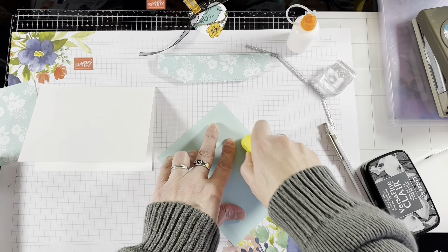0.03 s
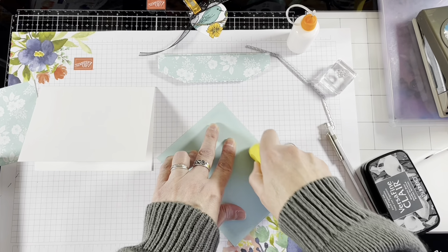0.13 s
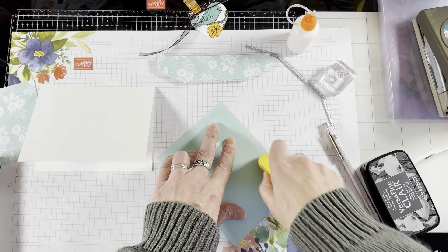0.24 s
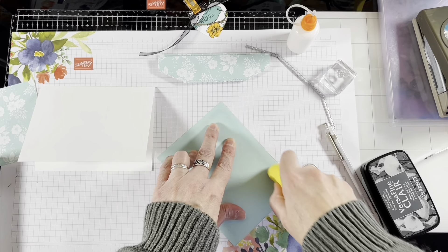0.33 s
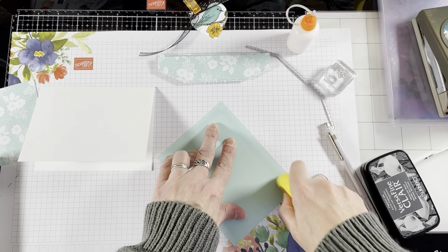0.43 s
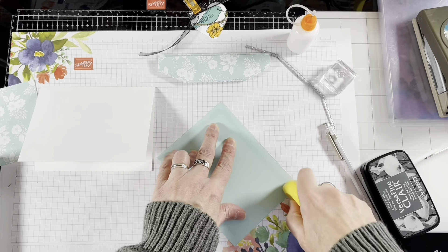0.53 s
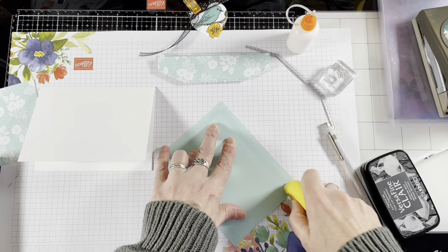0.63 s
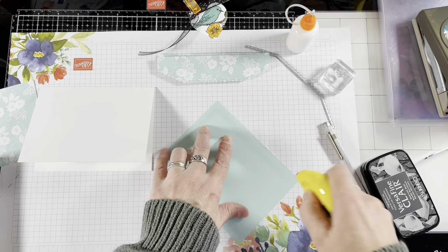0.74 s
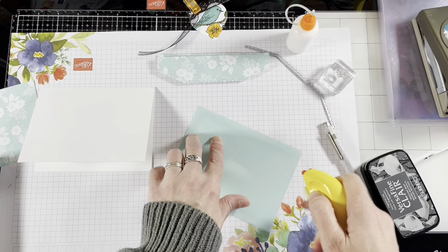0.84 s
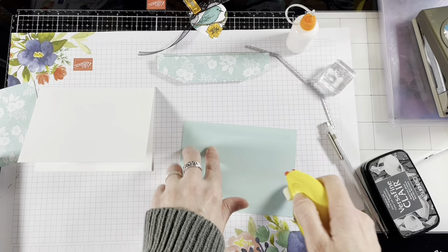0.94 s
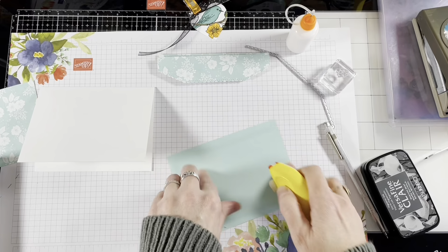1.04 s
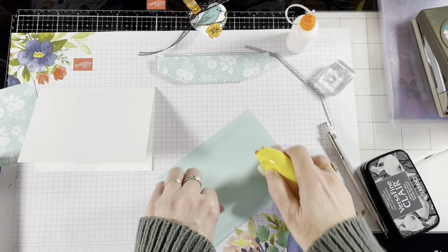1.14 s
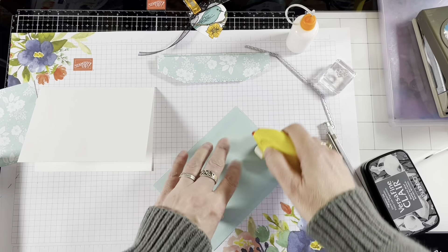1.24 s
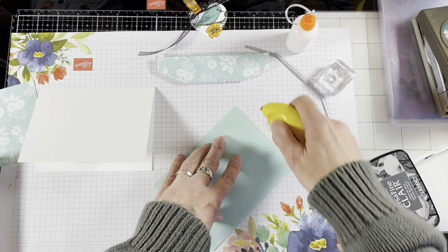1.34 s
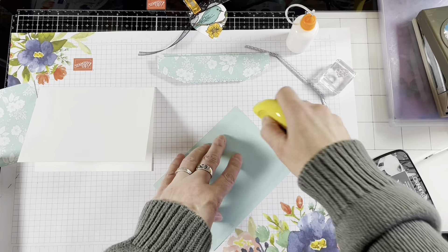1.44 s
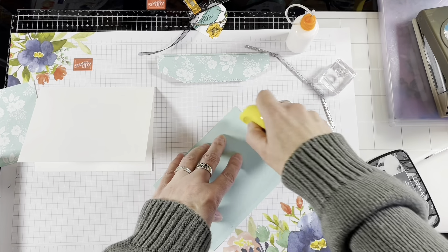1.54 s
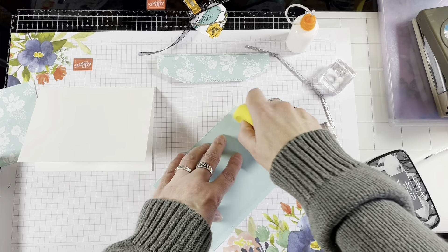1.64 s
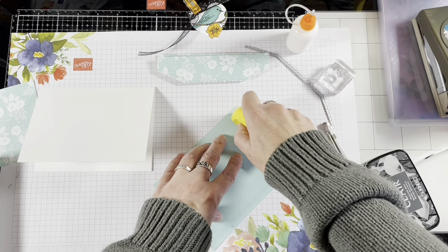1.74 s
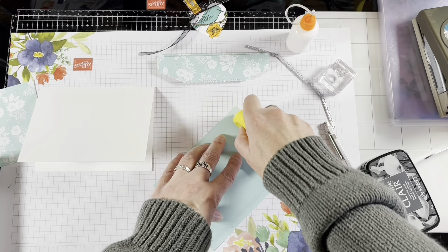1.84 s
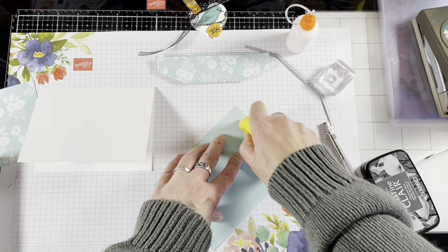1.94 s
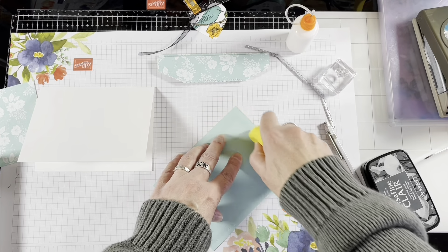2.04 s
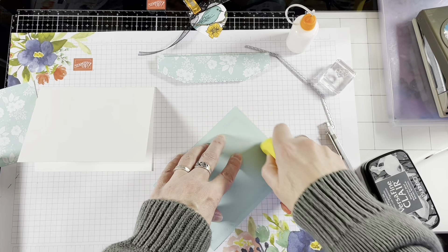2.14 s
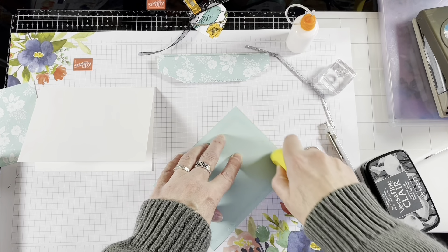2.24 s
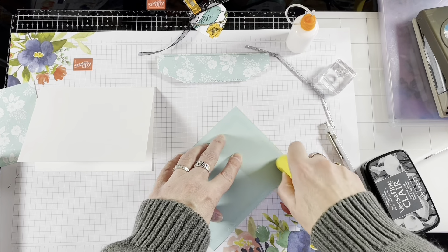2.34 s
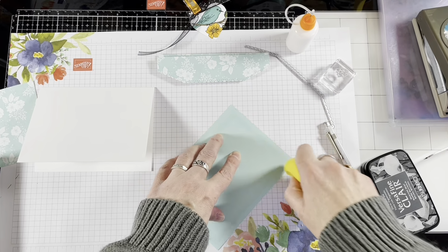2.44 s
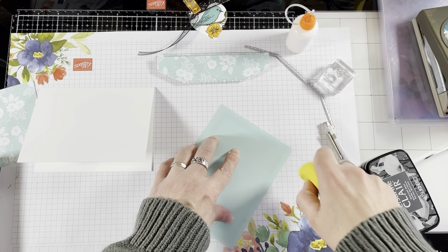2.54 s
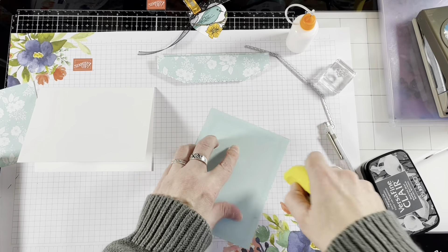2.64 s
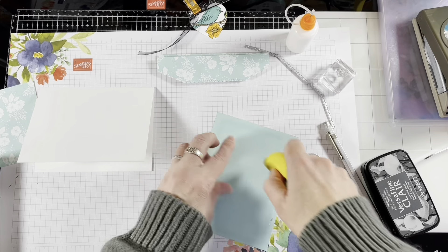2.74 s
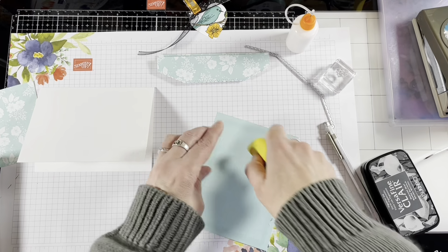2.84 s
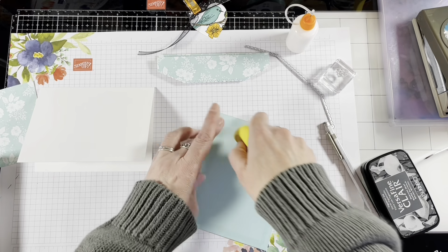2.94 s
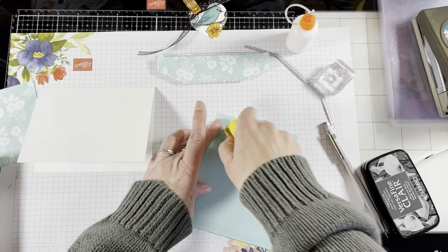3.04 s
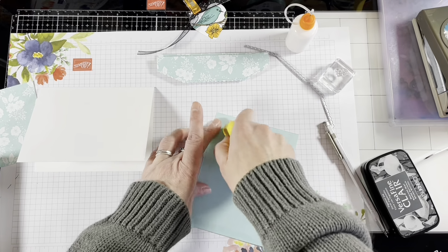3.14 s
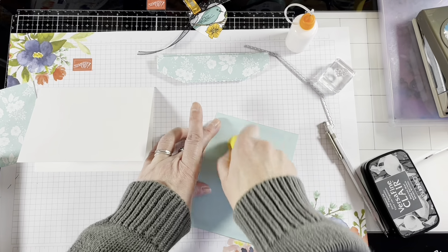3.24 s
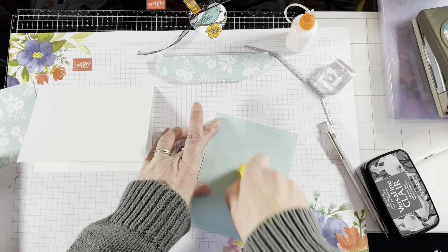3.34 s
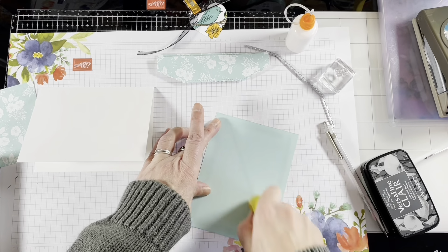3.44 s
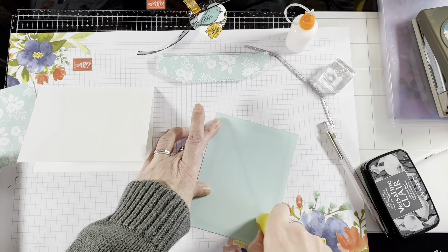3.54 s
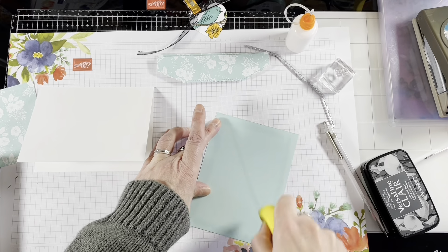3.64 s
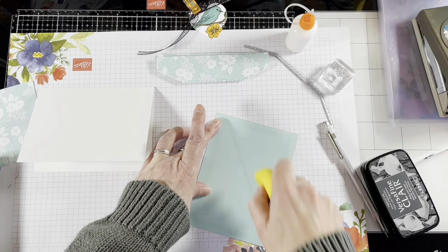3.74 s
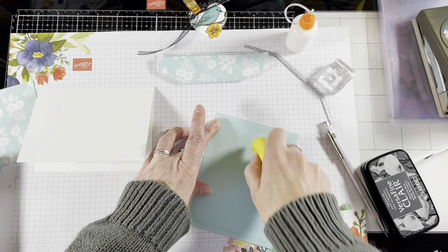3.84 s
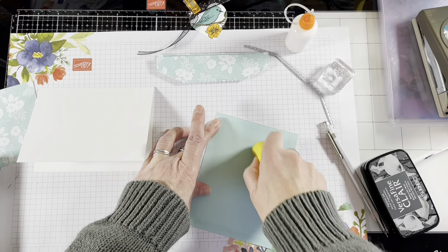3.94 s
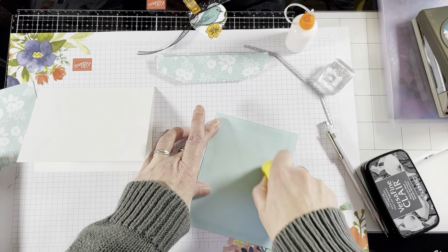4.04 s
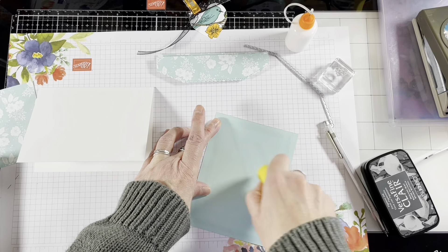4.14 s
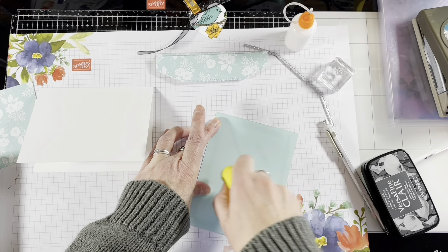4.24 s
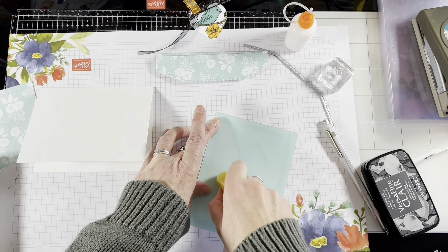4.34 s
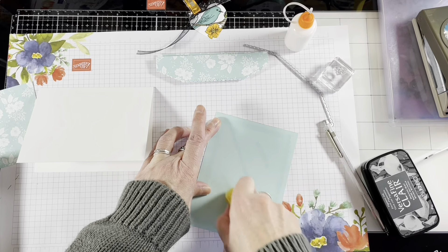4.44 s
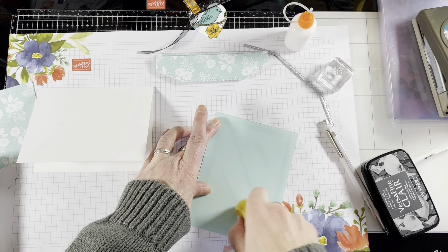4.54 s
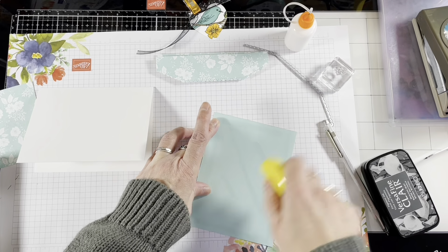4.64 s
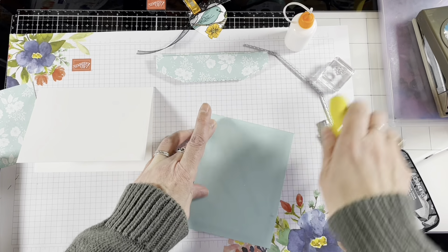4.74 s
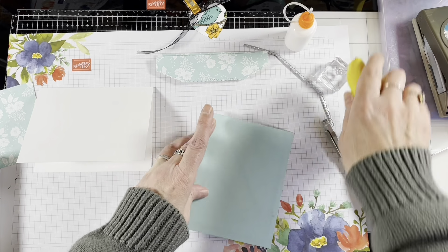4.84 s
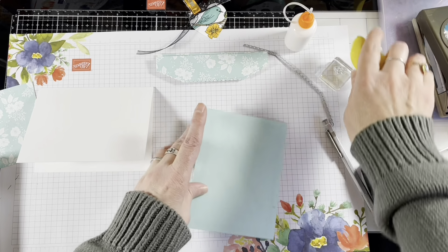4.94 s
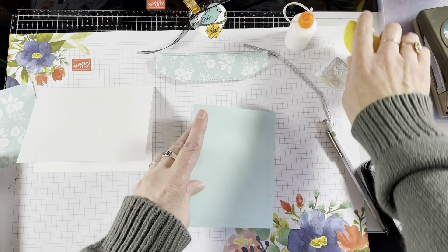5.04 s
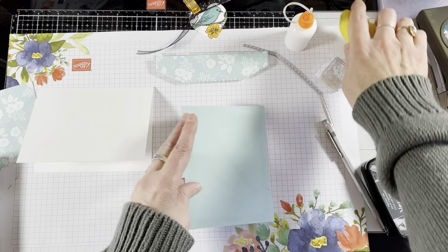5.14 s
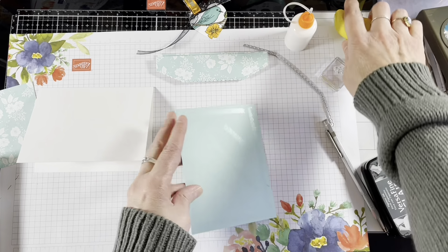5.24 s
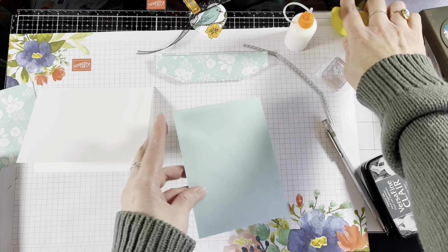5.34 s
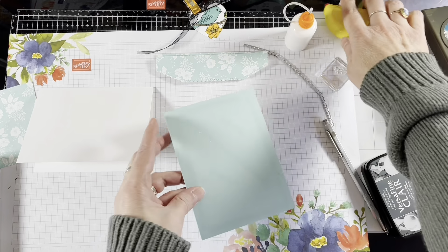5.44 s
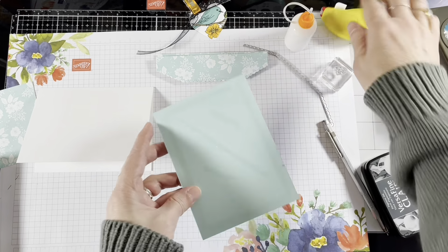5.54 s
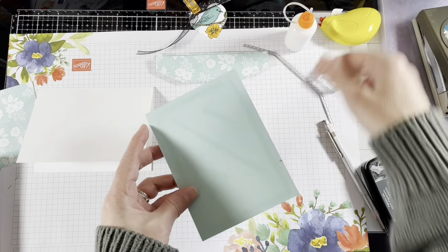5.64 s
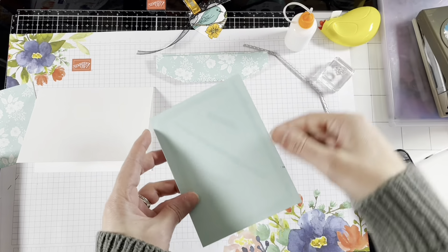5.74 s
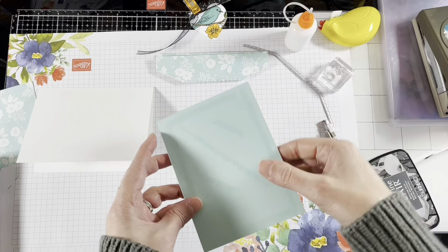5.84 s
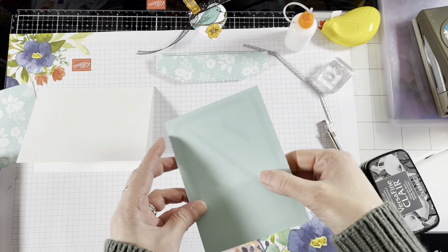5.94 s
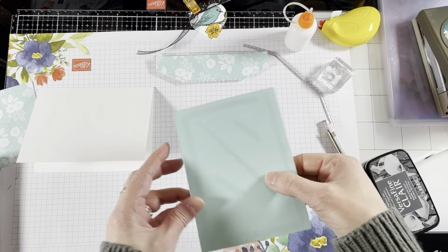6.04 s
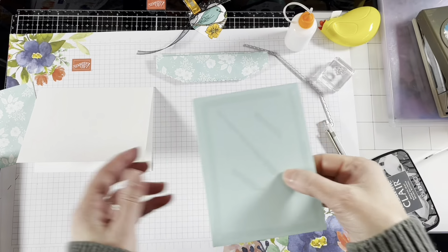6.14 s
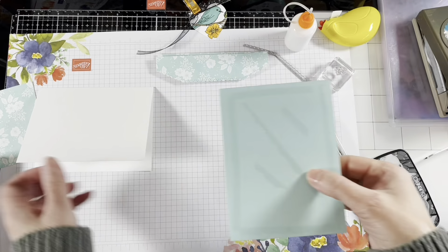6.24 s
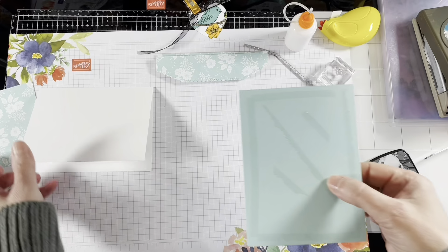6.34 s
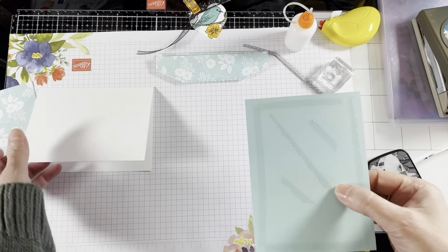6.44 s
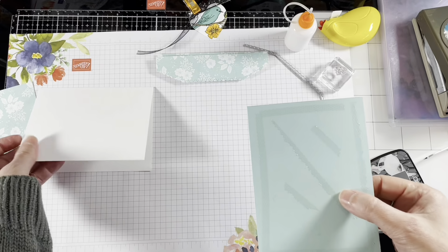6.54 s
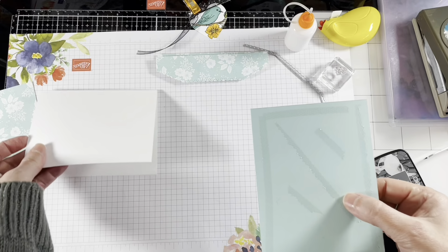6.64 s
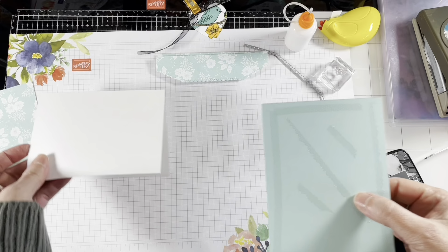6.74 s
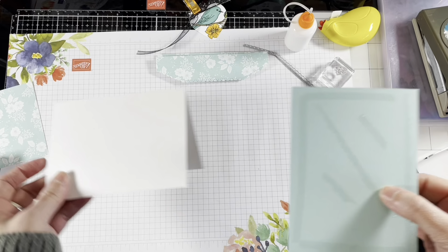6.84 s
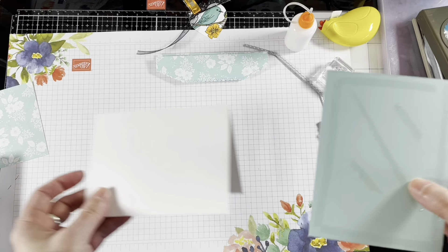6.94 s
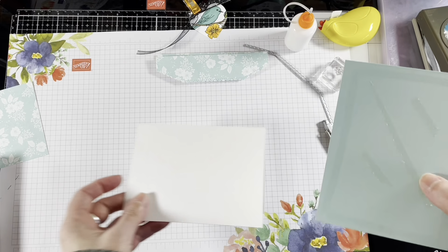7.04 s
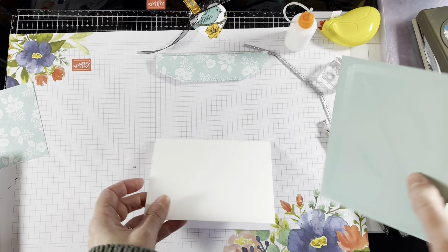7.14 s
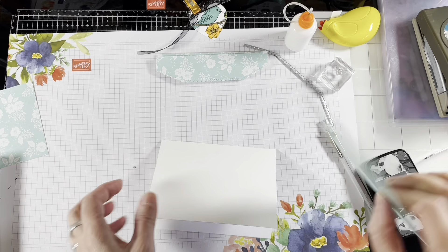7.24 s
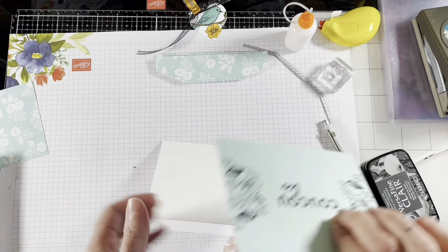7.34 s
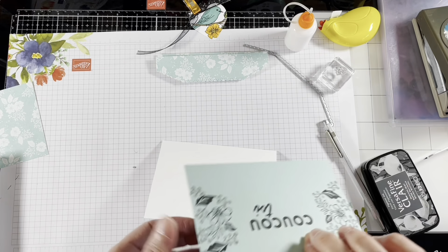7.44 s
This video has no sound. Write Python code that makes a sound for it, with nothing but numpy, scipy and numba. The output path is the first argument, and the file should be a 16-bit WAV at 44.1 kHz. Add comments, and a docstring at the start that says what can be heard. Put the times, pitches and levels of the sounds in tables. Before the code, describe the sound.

A handheld glue tape runner hisses and chatters across card in five strokes, then clatters down hard on the table; card rustles faintly afterwards.

```python
"""Craft table in a quiet room: a glue tape runner is drawn five times across a card. Moving resonances on dense
noise grains make the hissing roller, chattering housing and squeaking spool. Filtered grains make the card
slide and flap between strokes, and the room linger after some knocks; struck modes and short noise bursts make
knocks and ticks as the runner is dropped and rocks to rest. Narrow noise bands make an appliance's drone; two
ports of a phone hear it all with an echo."""
import sys
import numpy as np
from scipy import signal
from scipy.fft import rfft, irfft, next_fast_len
from scipy.io import wavfile
from scipy.ndimage import uniform_filter1d
from numba import njit

SR = 44100
rng = np.random.default_rng(int(sys.argv[2]) if len(sys.argv) > 2 else 0)


def unload_audio(sound):
    """Save the sound as a 16-bit wav file, at the path given as the first command line argument."""
    columns = np.transpose(np.atleast_2d(sound))
    # keep every value between -1 and 1, then stretch to whole-number steps
    steps = np.round(np.clip(columns, -1, 1) * 32767)
    wavfile.write(sys.argv[1], SR, steps.astype(np.int16))


N = 330729

# Tape strokes. Each row: touch in seconds, swell in seconds, travel in seconds, drift over the travel in dB,
# hiss in dB, hollow of the housing in dB, ring of the nose in dB, squeak drift in dB, squeak level in dB,
# mean ratchet teeth per second, half the fall over one tooth in dB.
STROKES = [(0.0, 0.0013, 0.545, -2, -42, -53, -56.5, -14, -58, 63.95, 7),
           (1.838, 0.17, 0.26, -3, -37, -52.5, -48, 0, -53, 69.9, 6.4),
           (3.185, 0.11, 0.21, -3.8, -32.5, -47.5, -45, 6, -55, 85.4, 4),
           (3.91, 0.071, 0.083, 2, -37, -50.5, -57.5, 3, -54.5, 90.1, 2.8),
           (4.328, 0.07, 0.11, 0.5, -37, -54.5, -53, 0, -59, 79.5, 9.2)]
# Card, fingers, sleeve or housing sliding, and the room lingering on after some knocks. Each row: touch in
# seconds, swell in seconds, travel in seconds, # drift over the travel in dB, rustle in dB, body of the card in
# dB, low tone in dB.
SLIDES = [(0.672, 0.0088, 0.1, -16, -63.5, -57.5, -60), (0.7, .11, 0.368, -1, -50, -66.5, -89),
          (0.83, 0.028, 0.023, 0, -71, -54, -48), (1.04, .015, 0.012, -7, -61, -60.5, -59),
          (1.12, 0.019, 0.057, -3.5, -95, -68.5, -65), (1.19, 0.024, 0.0053, -8, -44.5, -55.5, -56),
          (1.275, .01, 0.11, -23, -59.5, -63, -61), (1.34, 0.035, 0.049, -8.5, -79, -85.5, -58.5),
          (1.69, 0.014, 0.041, -14.5, -64.5, -59.5, -64.5), (1.79, 0.03, 0.037, -2, -79, -68, -70),
          (2.27, 0.02, 0.097, -7, -49.5, -59.5, -64), (2.4, 0.0085, 0.28, -7.5, -56.5, -64.5, -63),
          (2.5, 0.031, 0.19, -6, -56.5, -65.5, -84), (2.645, 0.0045, 0.078, -5, -51, -69.5, -103),
          (2.61, 0.015, 0.031, -7, -86, -71, -53.5), (2.984, 0.004, 0.032, -14, -57.5, -57.5, -52),
          (3.024, 0.013, 0.056, -11, -63, -57.5, -46), (3.15, 0.034, 0.0215, 0, -63, -66, -69),
          (3.52, 0.018, 0.029, -4.5, -52, -51.5, -62.5), (3.59, 0.014, 0.0086, 5.5, -58.5, -74, -83),
          (4.1, .02, 0.12, -12, -73, -67, -79), (4.16, 0.024, 0.016, -8, -70, -67.5, -62.5),
          (4.53, 0.044, 0.13, 4.5, -65, -76, -86), (4.715, 0.014, 0.12, -20, -56.5, -77, -99),
          (4.85, 0.037, 0.54, -10, -64.5, -80, -104), (5.05, .09, 0.052, -2, -68.5, -71.5, -99),
          (5.23, 0.023, 0.043, -2.5, -76.5, -74, -68), (5.358, .015, 0.014, -7.5, -67.5, -64, -44.5),
          (5.39, .02, 0.091, 3, -75, -70.5, -67.5), (5.6, .02, 0.1, -22, -52, -47, -35.5),
          (5.72, 0.0095, 0.12, -14.5, -66, -75, -57.5), (5.85, 0.041, 0.0091, -9, -69, -67.5, -63.5),
          (5.96, 0.0094, 0.018, -24.5, -79.5, -74, -53), (6.04, .022, 0.16, -19, -71, -64.5, -59),
          (6.525, 0.0097, 0.15, 6, -67.5, -70, -84), (6.715, .02, 0.024, -2.5, -54, -65, -96),
          (6.772, 0.0063, 0.019, -5.5, -54, -63.5, -73), (7.045, .008, 0.032, 1, -57, -68, -76),
          (7.065, 0.025, 0.0094, -17, -43.5, -48, -58), (7.115, 0.021, 0.04, -11, -53.5, -59.5, -62.5),
          (7.18, 0.022, 0.14, -10.5, -72.5, -75, -78.5)]
# Housing, later the card, knocking on the table. Each row: start in seconds, shell peak in dB,
# then re that peak: crack in dB, table thud in dB, cavity in dB.
KNOCKS = [(0.85, -50, 18.5, -20, -4), (1.698, -52, 6, 7, -3), (2.395, -44.5, 10.5, -6.5, -11.5),
          (2.551, -51, -8, -16, 8.5), (2.570, -41, -2, -12, 12), (2.597, -52, -13, -25.5, 14.5),
          (3.034, -45.5, -11.5, -4, 3.5), (3.055, -51.5, -10, -1.5, 9), (3.894, -37, 4.5, -5, 4),
          (4.313, -32.5, 1, -9, 6), (5.238, -49, -47.5, -4, 1), (5.278, -57, -25, -18, -7.5),
          (5.318, -47, 8.5, -4, -2), (5.362, -39, -3.5, -9, -4), (5.467, -29, -12, -36.5, -13),
          (5.483, -6, -7, -31, -11.5), (5.492, -10, -11, -23.5, -10.5), (5.528, -13, -3.5, -28.5, -16),
          (5.561, -22, -2.5, -29.5, -8), (5.571, -14.5, -3.5, -23.5, -13.5), (5.583, -17, -10.5, -23, -10),
          (5.598, -19, -13, -30.5, -14), (5.616, -24, -0.5, -17, -10.5), (5.629, -29, -7, -27, -7),
          (5.641, -36, -22, -25, -5), (5.668, -42.5, -19, -25, -8), (5.723, -35, -17, -10, -12),
          (5.734, -42, -21, -20, -15), (5.917, -52.5, -2, -11, 1), (5.955, -50, 6.5, 1.5, 6),
          (6.047, -47.5, 8, -21, 1), (6.059, -35, 4.5, -13, -2.5)]
# Ticks of ratchet, tape and card edge. Each row: start in seconds, peak in dB, pitch in Hz.
TICKS = [(0.002, -34, 3330), (0.036, -45, 4440), (0.0518, -41, 4410), (0.068, -34, 4350),
         (0.084, -38.5, 4380), (0.101, -32.5, 4400), (0.1176, -36, 4370), (0.136, -32, 4250),
         (0.1511, -39, 4160), (0.196, -39, 4430), (0.2384, -46, 5290), (0.258, -35.5, 4060),
         (0.2948, -40, 4120), (0.4058, -34, 4460), (0.422, -33, 4460), (0.4691, -32, 4230),
         (0.4858, -37.5, 4320), (0.506, -39, 4290), (0.0567, -38.5, 3500), (0.0853, -31, 3280),
         (0.1132, -28.5, 3580), (0.133, -31, 3270), (0.1558, -25, 3330), (0.177, -25, 3410),
         (0.32, -36, 4350), (0.331, -34, 4340), (0.3464, -30, 5540), (0.3591, -24.5, 4980),
         (0.3747, -29.5, 5660), (0.387, -31, 4850), (0.452, -31.5, 4180), (0.5287, -38.5, 4400),
         (0.5688, -31.5, 4730), (0.674, -17.5, 3750), (0.677, -30, 3793), (1.213, -68, 4420),
         (1.283, -45, 6000), (1.856, -29.5, 4650), (1.8899, -30, 4380), (1.913, -32.5, 4460),
         (1.938, -34, 4400), (1.955, -29, 4370), (1.9704, -33, 4490), (1.991, -36, 4400),
         (2.0379, -43, 4460), (2.056, -36, 4550), (2.1326, -38, 4500), (2.1467, -42, 4480),
         (2.185, -32.5, 4340), (2.242, -36, 4260), (2.2537, -37.5, 4230), (2.136, -33, 3250),
         (2.262, -35, 3380), (2.289, -33, 4300), (2.3143, -42, 4500), (2.3494, -36, 4560),
         (2.399, -38, 4330), (2.57, -43, 3720), (2.658, -42, 4870), (2.986, -56, 2894), (3.198, -57, 3300),
         (3.262, -47, 3230), (3.29, -39, 4240), (3.334, -31, 4300), (3.349, -28, 4260), (3.361, -30, 4330),
         (3.377, -42, 4270), (3.392, -34, 3290), (3.418, -29, 3274), (3.424, -28, 6140), (3.482, -25, 3330),
         (3.5081, -31, 3440), (3.529, -39, 3330), (3.567, -39, 3273), (3.9818, -34, 3560),
         (4.157, -48.5, 4900), (4.381, -42, 3100), (4.398, -22, 6150), (4.453, -25.5, 3470),
         (4.5076, -37, 3520), (4.7286, -47.5, 3510), (5.491, -14.5, 4700), (5.5699, -6.5, 5055),
         (6.742, -52, 3010), (6.777, -48.5, 2970), (7.086, -46, 5800), (7.135, -56, 2950)]
# Faint breathy tones. Each row: start in seconds, length in seconds, mean level in dB, pitch in Hz.
TONES = [(1.228, 0.1, -76.5, 1000), (4.202, 0.14, -73.5, 950), (4.871, 0.32, -76.5, 2030),
         (5.808, 0.014, -66.5, 2480), (6.174, 0.063, -75.5, 978), (7.194, 0.063, -71.5, 990)]
# Housing shell, struck. Each row: mean pitch in Hz, mean level in dB, nominal t60 in seconds.
HOUSING_MODES = [(904, -8, 0.048), (1007.5, 1, 0.023), (1127, -3.5, 0.03), (1257, -6.5, 0.042),
                 (1430, 2.5, 0.022), (1840, -16.5, 0.013), (1787, -5.5, 0.043), (1780, -13.5, 0.11),
                 (1980, -7, 0.037), (2137, -5, 0.035), (2460, -8.5, 0.041), (3300, -11.5, 0.03),
                 (3830, -15.5, 0.014)]
# Air and walls of the hollow housing, struck. Each row: mean pitch in Hz, mean level in dB, nominal t60 in seconds.
CAVITY_MODES = [(373, -16, 0.04), (624, 0, 0.095)]
# Table, struck. Each row: mean pitch in Hz, mean level in dB, nominal t60 in seconds.
TABLE_MODES = [(60, -5, 0.41), (109.6, 7.5, 0.26), (157, -10.5, 0.53), (256.8, -9, 0.064)]
# Housing, rubbed. Each row: mean pitch in Hz, width in Hz, mean level in dB.
RUBBED_MODES = [(1058, 97, 9), (1245, 50, 15), (1746, 89, -1.5), (2140, 78, -2), (2694, 96, 1),
                (5100, 300, -6)]
# Resonances that ring in the slides: mean pitches in Hz.
SLIDE_RING_HZ = (970, 1730, 2280, 3070)
# Colour of peeling tape. Each row: frequency in Hz, level per Hz in dB.
TAPE_COLOUR = [(200, -13), (700, -6.5), (1500, -9.5), (3000, -2), (5000, -2.5), (7000, -1.5), (9500, -1.5),
               (13000, -12.5), (15500, 0.5)]
# Colour of rubbed card. Each row: frequency in Hz, level per Hz in dB.
CARD_COLOUR = [(1500, -40.5), (2800, -3.5), (4000, 0.5), (6000, 3.5), (8000, 5), (10000, 1.5),
               (13000, -7.5), (15500, -1)]
# Colour of the room air. Each row: frequency in Hz, level per Hz in dB.
AIR_COLOUR = [(12, -39), (20, -8.5), (50, -10.5), (76, -18.5), (114, -2), (137, -21.5), (200, -26.5),
              (307, -24), (370, -24), (470, -43.5), (1020, -41.5), (1340, -46.5), (12000, -63.5),
              (15600, -95.5), (22000, -120)]
# Extra colour of the air part that differs left and right. Each row: frequency in Hz, gain in dB.
AIR_WIDE = [(60, -36.5), (200, -15), (500, 1), (2000, -4.5), (6000, -2), (12000, -6)]
# Appliance drone. Each row: pitch in Hz, width in Hz, level in dB.
DRONE = [(56.14, 14, -61.5), (111.8, 4.9, -63)]
# Room decay. Each row: band centre in Hz, t60 in seconds.
ECHO = [(150, 0.47), (600, 0.11), (2000, 0.22), (8000, 0.26)]
# Two ports of the phone. Each row: frequency in Hz, phase between the ports in radians.
PORTS = [(0, 0), (150, 0), (600, -.6), (860, .1), (2400, .1), (2850, .7), (4500, .1), (5400, .6),
         (6100, 1.4), (8300, 2.5), (9500, 2.75), (9900, 3.03), (13300, 3.03), (13600, 3.7), (15000, 3.9),
         (15700, 4.5)]

HOLLOW_HZ, SQUEAK_HZ = 619, 3324
SPOOL_THROB_DB, SHELL_FLICKER_DB, RESONANCE_FLICKER_DB = 1.9, 1.5, 2
SLIDE_RING_WANDER = 0.037  # share of the pitch
LIFT_DB_PER_S, SETTLE_DB_PER_S = 380, 523  # fade after the runner lifts; after a slide stops
ONSET_POWER = 0.99  # gain grows as this power of the time since touching
PUT_DOWN_S = 5.63  # the runner settles; later taps do not ring its cavity
HARD_KNOCK_RISE_S, SOFT_KNOCK_RISE_S = 0.0025, 0.0055
SOFT_KNOCK_DB = -38  # softer knocks are cushioned by the hand
GRIP_S = 0.006  # e-fold time of the stronger first swings
SPOOL_RING_S, TICK_RING_S = 0.043, 0.016  # scale of push decay and inverse bandwidth
SPOOL_SNAP_DB, TICK_SNAP_DB = -5.5, -5.5  # snap re burst
SPOOL_PUSH_SHARE, TICK_PUSH_SHARE = 0.27, 0.44  # push t60 re ring scale
HARD_TICK_DB = -21.5  # harder ticks shake a wide band
TONE_WIDTH = 0.09  # re pitch
ECHO_DB, ECHO_WIDE_DB = -11.5, -11
AIR_MEAN_DB, AIR_WIDE_DB = -62, -56.5  # the second before its extra colour
TOP_HZ, EDGE_HZ = 15720, 16750


def strokes():
    """Tape peels in dense slips that ring the housing; the spool squeaks in throbs; the table rumbles."""
    hiss_gain, hollow_gain, nose_gain = contact([row[:7] for row in STROKES], LIFT_DB_PER_S)
    squeak_gain, = contact([row[:3] + row[7:9] for row in STROKES], LIFT_DB_PER_S)
    nose_hz = 4350 * (1 + 0.025 * walk(8) + 0.012 * walk(50))
    slips = shape(grains(14000, 1.8) * undb(1.1 * walk(70)), TAPE_COLOUR)
    jolts = slips * ratchet()

    shell = np.zeros(N)
    for hz, width_hz, db in RUBBED_MODES:
        flicker = undb(db + SHELL_FLICKER_DB * walk(15))
        shell += flicker * sweep(slips, hz * (1 + 0.019 * walk(10)), 1.0 * width_hz)
    body = unit(0.88 * slips + 0.74 * unit(jolts) * np.std(slips) + shell)

    nose = sweep(sweep(jolts, nose_hz, 450.0), nose_hz, 1200.0)
    nose = unit(nose * undb(2.2 * walk(30)))
    hollow = unit(band(band(slips, HOLLOW_HZ, 66), HOLLOW_HZ, 290))

    spool_hz = SQUEAK_HZ * (1 + 0.027 * walk(14))
    squeak = sweep(sweep(jolts, spool_hz, 300.0), spool_hz, 640.0)
    lower = band(band(jolts, 0.55 * SQUEAK_HZ, 197), 0.76 * SQUEAK_HZ, 360)
    throb = undb(SPOOL_THROB_DB * (walk(40) + walk(11)))
    spool = unit((squeak + undb(-11.5) * lower) * throb)

    rumble = unit(band(band(rng.standard_normal(N), 68, 25), 58, 46))
    hiss = body + undb(-18.5) * rumble
    return hiss_gain * hiss + nose_gain * nose + hollow_gain * hollow + squeak_gain * spool


def ratchet():
    """Each tooth of the spool jolts the housing; the jolt dies away before the next."""
    stroke = np.searchsorted([row[0] for row in STROKES], np.arange(N) / SR, side="right") - 1
    rate_hz, depth_db = np.transpose(STROKES)[-2:, stroke]
    phase = np.cumsum(rate_hz * (1 + 0.15 * walk(40)) / SR) % 1
    return undb(-2 * depth_db * phase)


def slides():
    """Paper fibres rustle; a broad body with narrow resonances and a low flap join; the held housing hums
    along."""
    rustle_gain, body_gain, low_gain = contact(SLIDES, SETTLE_DB_PER_S)
    held = np.arange(N) / SR < PUT_DOWN_S
    fibres = grains(9000, 2.2) * undb(1.2 * walk(60))
    surface = grains(12000, 2.2) * undb(1.3 * walk(40))

    resonances = np.zeros(N)
    for hz in SLIDE_RING_HZ:  # pitches drift a little
        resonance = sweep(fibres, hz * (1 + SLIDE_RING_WANDER * walk(9)), 120.0)
        resonances += resonance * undb(RESONANCE_FLICKER_DB * walk(11))
    broad = unit(band(band(fibres, 1500, 1600), 2100, 3900))
    body = unit(broad + undb(1.0) * unit(resonances))

    hum = unit(band(band(fibres, HOLLOW_HZ, 60), HOLLOW_HZ, 160))
    flap = unit(band(band(fibres, 550, 310), 440, 600))
    low = np.where(held, hum + undb(-14.0) * flap, flap)
    rustle = unit(shape(surface, CARD_COLOUR)) + undb(-21.0) * flap
    return rustle_gain * rustle + body_gain * body + low_gain * low


def knocks():
    """A blow rings shell, cavity and table modes, with noise for clatter, thump and crack."""
    out, t = np.zeros(N), np.arange(SR // 10) / SR
    for s, db, crack_db, thud_db, cavity_db in KNOCKS:
        noise = rng.standard_normal((3, len(t)))
        rise_s = SOFT_KNOCK_RISE_S if db < SOFT_KNOCK_DB else HARD_KNOCK_RISE_S
        held = s < PUT_DOWN_S
        thump = band(band(noise[2], 400, 370), 350, 410) * decay(t, 0.15) * rise(t, 0.0038)
        crack = shape(noise[0], CARD_COLOUR) * decay(t, 0.036) * rise(t, 0.00053)
        clatter = band(band(noise[1], 1500, 1100), 1600, 2000) * decay(t, 0.04) * rise(t, rise_s)
        # shell, clatter and cavity start 1 ms early
        add(out, s - 0.001, undb(db) * ring(HOUSING_MODES, 2.1, 0.0076, rise_s, 1.5))
        add(out, s - 0.001, undb(db - 6.5) * peak_one(clatter))
        if held:
            add(out, s - 0.001, undb(db + cavity_db) * ring(CAVITY_MODES, 2.5, 0.0013, 0.003))
        add(out, s, undb(db + cavity_db - (10.5 if held else 3)) * peak_one(thump))
        add(out, s, undb(db + crack_db) * peak_one(crack))
        add(out, s, undb(db + thud_db) * ring(TABLE_MODES, 4.1, 0.032, 0.0098))
    return out


def ticks():
    """A tooth strikes, then scrapes: a noise push excites a short ring, over a broad snap."""
    out, t = np.zeros(N), np.arange(SR // 20) / SR
    for s, db, hz in TICKS:
        spool = hz < 1.12 * SQUEAK_HZ  # ticks near or below the squeak ring longer
        ring_s = SPOOL_RING_S if spool else TICK_RING_S
        push_share = SPOOL_PUSH_SHARE if spool else TICK_PUSH_SHARE
        snap_db = SPOOL_SNAP_DB if spool else TICK_SNAP_DB
        noise = rng.standard_normal((2, len(t)))
        scrape = noise[1]
        scrape[:SR // 4000] = 4  # the strike, first 0.25 ms
        scrape *= np.where(t < 1 / 4000, np.cos(2 * np.pi * hz * t), 1)
        push = scrape * rise(t, 0.0003) * decay(t, push_share * ring_s)
        snap = shape(noise[0], TAPE_COLOUR) * rise(t, 0.0003) * decay(t, 0.016)
        # the shorter the ring, the wider its band
        burst = band(push, hz, (14.0 if db > HARD_TICK_DB else 3.5) / ring_s)
        if spool:  # a lower mode answers
            burst = burst + undb(-7.5) * band(push, 0.69 * SQUEAK_HZ, 2.6 / ring_s)
        add(out, s, undb(db) * peak_one(burst))
        add(out, s, undb(db + snap_db) * peak_one(snap))
    return out


def tones():
    """Narrow bands of noise that fade in and out."""
    out = np.zeros(N)
    for s, length_s, db, hz in TONES:
        count = int(length_s * SR)
        breath = band(rng.standard_normal(count), hz, TONE_WIDTH * hz)
        breath = unit(band(breath, hz, 2 * TONE_WIDTH * hz))
        fade = np.sqrt(np.hanning(count))
        add(out, s, undb(db) * breath * fade * undb(2 * walk(38)[:count]))
    return out


def echo(x):
    """Decaying noise, each band with its own t60, as the room's answer."""
    t = np.arange(SR // 2) / SR
    tail = np.zeros(len(t))
    for hz, t60_s in ECHO:
        tail += band(band(rng.standard_normal(len(t)), hz, 2.6 * hz), hz, 2.4 * hz) * decay(t, t60_s)
    tail = tail * np.clip(t / 0.00057, 0, 1)
    return signal.oaconvolve(x, tail / np.sqrt(np.sum(tail ** 2)))[:N]


def room_air():
    """Low, wavering murmur of air, a two-tone drone of narrow noise, and air unlike left and right."""
    air = undb(AIR_MEAN_DB + 0.89 * walk(13.0)) * unit(shape(rng.standard_normal(N), AIR_COLOUR))
    for hz, width_hz, db in DRONE:
        air = air + undb(db) * unit(band(band(rng.standard_normal(N), hz, width_hz), hz, 3 * width_hz))
    other_air = unit(shape(rng.standard_normal(N), AIR_COLOUR))
    return air, undb(AIR_WIDE_DB) * shape(other_air, AIR_WIDE)


def contact(rows, fade_db_per_s):
    """Gain of each layer: swell from the touch, drift while moving, steady fade for a second after."""
    t, out = np.arange(N) / SR, 0
    for touch_s, swell_s, travel_s, drift_db, *levels_db in rows:
        swell = np.clip((t - touch_s) / swell_s, 0, 1) ** ONSET_POWER
        times_s = [0, travel_s, travel_s + 1]
        db = np.interp(t - touch_s - swell_s, times_s, [0, drift_db, drift_db - fade_db_per_s])
        out = out + np.outer(undb(levels_db), swell * undb(db))
    return out


def ring(modes, scatter_db, detune, rise_s, grip=0):
    """One blow on a set of modes, varied each time; soft contact rises slowly, grip adds to the first swings."""
    hz, db, t60_s = np.transpose(modes)[:, :, None]
    t = np.arange(int(t60_s.max() * SR)) / SR
    level, pitch, phase, damping = rng.standard_normal((4, len(modes), 1))
    swings = np.sin(2 * np.pi * (hz * (1 + detune * pitch) * t + phase))
    fades = decay(t, t60_s * (1 + 0.12 * np.tanh(damping)))
    y = (undb(db + scatter_db * level) * swings * fades).sum(0)
    y = y * (1 - np.exp(-(t / rise_s) ** 2)) * (1 + grip * np.exp(-t / GRIP_S))
    return peak_one(y)


def grains(rate_hz, spread_db):
    """Dense slips of very unequal size, rms 1."""
    hits = rng.random(N) < rate_hz / SR
    sizes = undb(spread_db * np.minimum(rng.exponential(size=N), 4.5))
    return unit(hits * rng.standard_normal(N) * sizes)


def walk(rate_hz):
    """Random levels held 1 / rate_hz s and slewed; spread near 1.8."""
    hold = int(SR / rate_hz)
    steps = np.repeat(rng.standard_normal(N // hold + 1), hold)
    return 2.2 * uniform_filter1d(steps, hold)[:N]


@njit
def sweep(x, hz, width_hz):
    """State-variable resonance whose centre moves."""
    y, band_state, low_state = np.empty(len(x)), 0., 0.
    for i in range(len(x)):
        g, k = np.tan(np.pi * hz[i] / SR), width_hz / hz[i]
        v = (band_state + g * (x[i] - low_state)) / (1 + g * (g + k))
        band_state = 2 * v - band_state
        low_state = low_state + 2 * g * v
        y[i] = k * v
    return y


def band(x, hz, width_hz):
    """One resonance, gain 1 at the centre."""
    return signal.lfilter(*signal.iirpeak(hz, hz / width_hz, SR), x)


def shape(x, points):
    """Colour a sound with (Hz, dB) points, joined over log frequency."""
    hz, db = np.transpose(points)
    size = next_fast_len(len(x))
    f = np.maximum(np.arange(size // 2 + 1) * SR / size, 1)
    gain = undb(np.interp(np.log(f), np.log(hz), db))
    return irfft(rfft(x, size) * gain, size)[:len(x)]


def decay(t, t60_s):
    """Exponential fade of 60 dB in t60_s."""
    return 1000. ** (-t / t60_s)


def rise(t, rise_s):
    """Exponential approach to 1."""
    return 1 - np.exp(-t / rise_s)


def undb(db):
    """Decibels to gain."""
    return 10 ** (np.asarray(db) / 20)


def unit(x):
    """Scale to rms 1."""
    return x / np.sqrt(np.mean(x ** 2))


def peak_one(x):
    """Scale to peak 1."""
    return x / np.abs(x).max()


def add(out, s, y):
    """Mix y in at s seconds."""
    i = int(s * SR)
    out[i:i + len(y)] += y[:N - i]


def scene():
    """Sound from below reaches two ports of the phone out of step, opposed in the treble."""
    near = strokes() + slides() + knocks() + ticks() + tones()
    air, unlike = room_air()
    size = next_fast_len(N + 4096)
    f = np.arange(size // 2 + 1) * SR / size
    turn = np.exp(0.5j * np.interp(f, *np.transpose(PORTS)))  # half the phase to each port
    both = rfft(near + undb(ECHO_DB) * echo(near), size)
    left = irfft(both * turn, size)[:N]
    right = irfft(both * turn.conj(), size)[:N]
    side = unlike + undb(ECHO_WIDE_DB) * band(echo(near), 2500, 6000)
    return np.array([left + air + side, right + air - side])


def record(dry):
    """The phone shelves off the top, then cuts it."""
    shelf = signal.sosfilt(signal.ellip(9, 0.3, 36, TOP_HZ, fs=SR, output="sos"), dry)
    return signal.sosfilt(signal.ellip(10, 0.2, 70, EDGE_HZ, fs=SR, output="sos"), shelf)


dry = scene()
out = record(dry)
unload_audio(out)
```